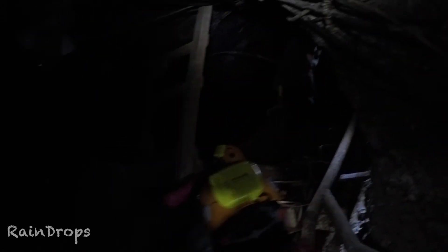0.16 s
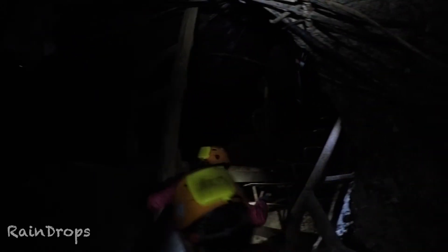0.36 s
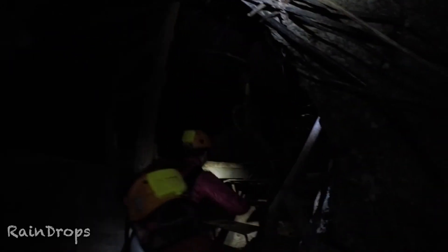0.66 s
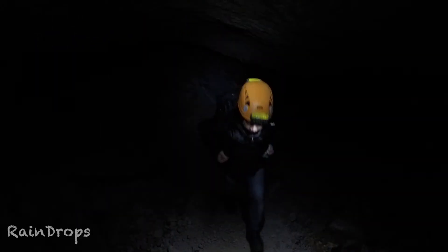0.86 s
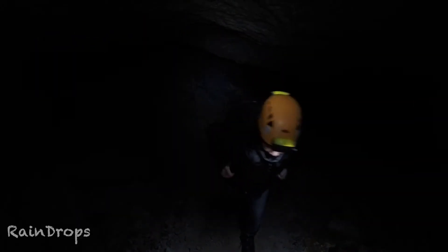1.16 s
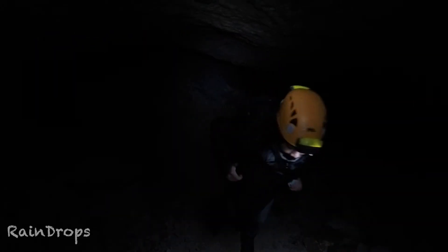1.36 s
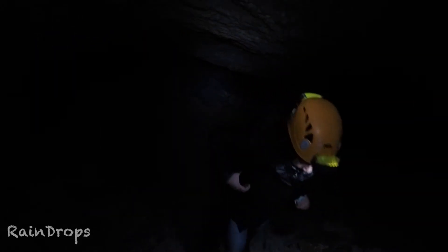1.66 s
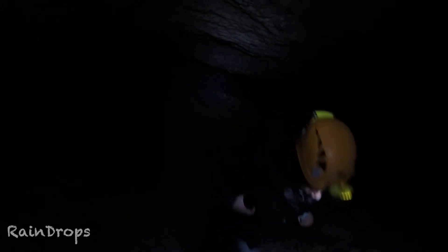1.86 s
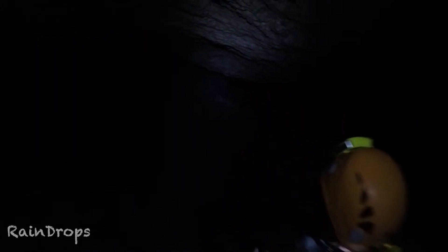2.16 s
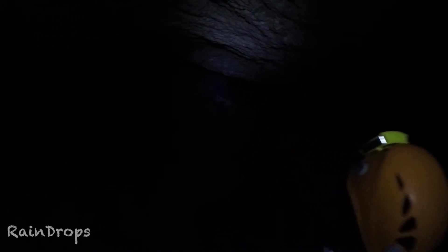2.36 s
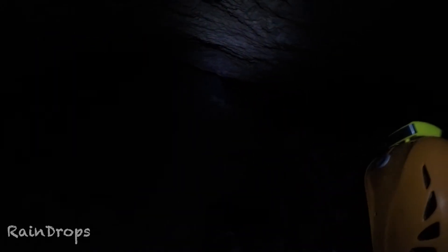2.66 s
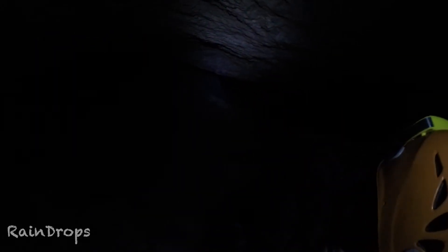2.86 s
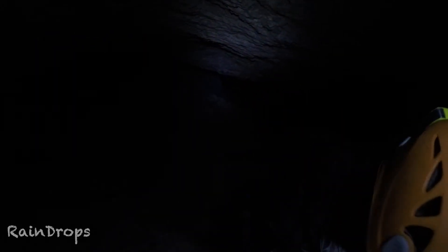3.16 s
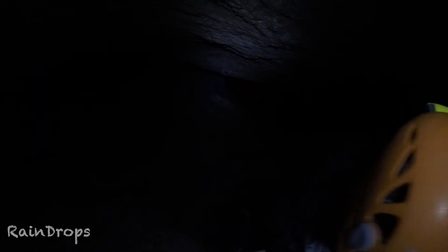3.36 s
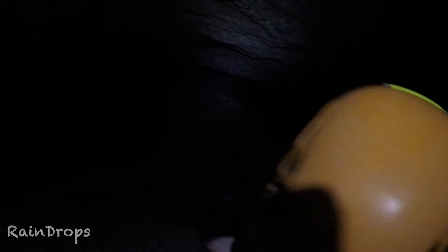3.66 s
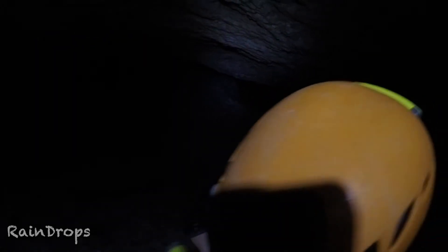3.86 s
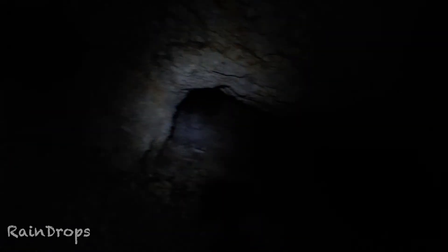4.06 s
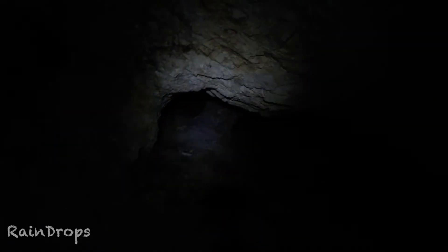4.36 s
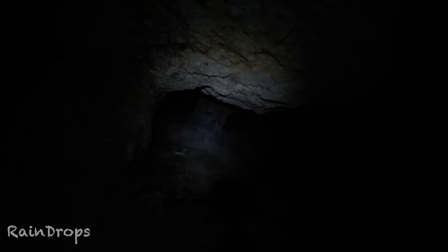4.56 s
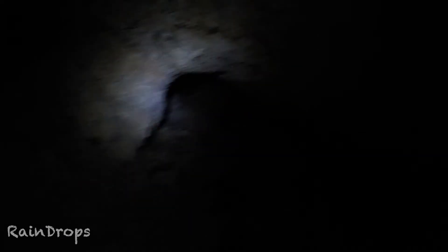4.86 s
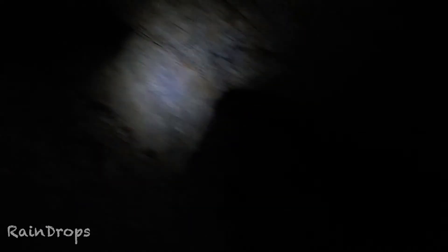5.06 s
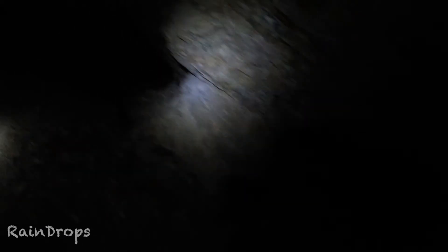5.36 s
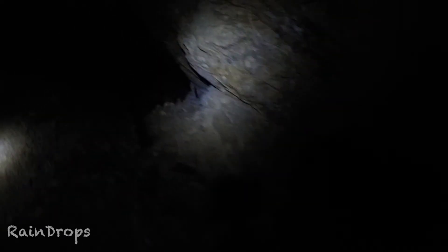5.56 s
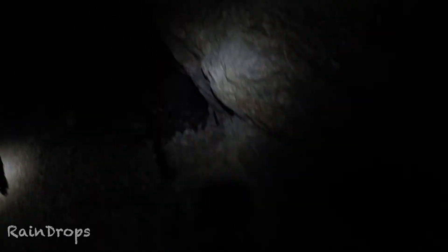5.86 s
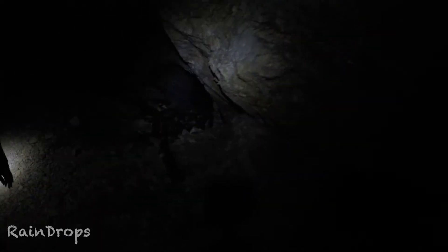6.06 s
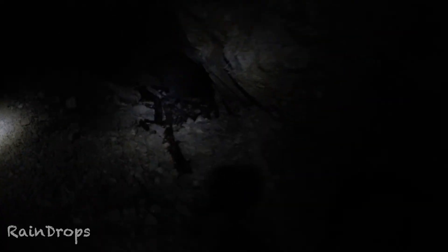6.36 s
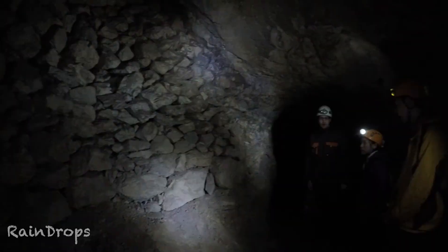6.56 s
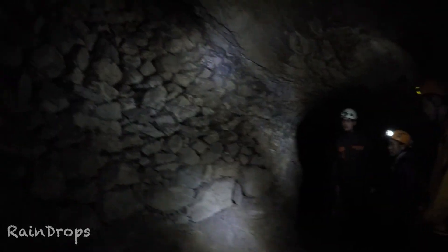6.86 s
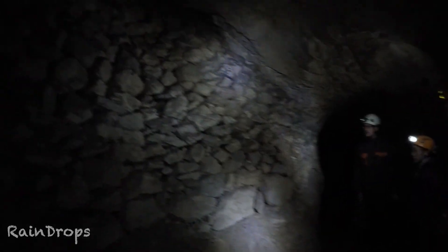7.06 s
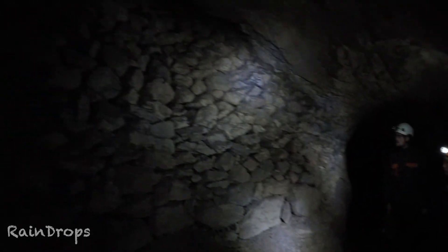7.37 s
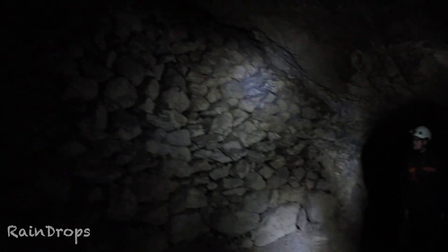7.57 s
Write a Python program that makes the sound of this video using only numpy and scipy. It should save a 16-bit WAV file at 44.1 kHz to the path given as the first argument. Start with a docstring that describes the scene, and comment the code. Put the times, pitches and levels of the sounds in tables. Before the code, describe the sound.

Close, irregular footsteps scuff and grind on loose gravel and rock in a dry underground tunnel, over a faint hiss.

```python
"""Boots tread and scuff over loose stones in a dry rock tunnel, close to a small stereo microphone.
Gravel grinds as weight rolls over it and sends a rumble through the ground. Stones knock together
under the soles, hard pebbles clink, and the near walls give both a short dull tail.
Stray chips tick and a faint hiss lies below."""
import sys
import numpy as np
from scipy import signal
from scipy.fft import rfft, irfft, next_fast_len
from scipy.io import wavfile

SR = 44100
rng = np.random.default_rng(int(sys.argv[2]) if len(sys.argv) > 2 else 0)


def store_pcm(level_fs):
    """Save levels as 16-bit WAV."""
    pcm = np.round(np.clip(level_fs, -1, 1) * 32767).astype(np.int16)
    wavfile.write(sys.argv[1], SR, np.atleast_2d(pcm).T)


N = 340452
HIT_SAMPLES = 3072
LEFT_DB, LEFT_LAG_S = -1.93, 3.5e-5   # feet, left re right


def from_db(db):
    """Decibels to gain."""
    return np.exp(np.asarray(db) * np.log(10) / 20)


def rms_one(x):
    """Scaled to rms 1."""
    return x / np.sqrt(np.mean(x ** 2) + 1e-20)


def peak_one(x):
    """Each row scaled to peak 1."""
    return x / np.max(np.abs(x), axis=-1, keepdims=True)


def pan(left_db):
    """Stereo gains for a level of left re right."""
    return from_db([[left_db / 2], [-left_db / 2]])


def at_hz(points, hz):
    """Table read on a log-frequency axis."""
    points_hz, values = np.transpose(points)
    return np.interp(np.log(hz), np.log(points_hz), values)


def band(x, low_hz, high_hz):
    """Gentle band-pass."""
    return signal.sosfilt(signal.butter(2, [low_hz, high_hz], "band", fs=SR, output="sos"), x)


def lowpass(x, cut_hz):
    """Sixth-order low-pass."""
    return signal.sosfilt(signal.butter(6, cut_hz, fs=SR, output="sos"), x)


def drift(rate_hz):
    """Slow noise, rms 1, one value per 20 samples."""
    pole = np.exp(-2 * np.pi * rate_hz * 20 / SR)
    slow = signal.lfilter([1], [1, -2 * pole, pole * pole], rng.standard_normal(N // 20 + 2002))
    return rms_one(slow[2000:])


def flicker(db):
    """Levels at every 20th sample to a gain per sample."""
    return np.interp(np.arange(N) / 20, np.arange(len(db)), from_db(db))


def ring(drive, hz, t60_s):
    """One mode: a unit click starts a decaying sine of height 1."""
    r, w = from_db(-60 / (t60_s * SR)), 2 * np.pi * hz / SR
    return signal.lfilter([0, np.sin(w)], [1, -2 * r * np.cos(w), r * r], drive + 1e-18)


def coloured(sources, spectrum, coherence, shared_db, own_db, rate_hz):
    """Mid/side noise to stereo, rms 1; half-octave bands flicker together and on their own."""
    mid_side, together = np.zeros((2, N)), drift(rate_hz)
    edges_hz = 20 * 2 ** np.arange(0, 9.1, .5)
    for k, (low, high) in enumerate(zip(edges_hz, edges_hz[1:])):
        hz = np.sqrt(low * high)
        if spectrum[0][0] < high and low < spectrum[-1][0]:
            alike = np.clip(at_hz(coherence, hz), -1, 1)
            source = sources[k % len(sources)] * np.sqrt([[1 + alike], [1 - alike]])
            gain = flicker(at_hz(spectrum, hz) + shared_db * together + own_db * drift(rate_hz))
            mid_side += band(source, low, high) * gain
    return rms_one(mid_side[0] + mid_side[1] * [[1], [-1]])


def footsteps():
    """Grind and grit levels [dB]: each step holds a steady grind and swells to a crunch at full weight."""
    # steps: (landing [s], time on ground [s], steady grind [dB], landing to full weight [s],
    # crunch [dB], crunch swell [dB/s], grit re grind [dB])
    steps = [(-0.05, .33, -56, .17, -51.5, 70.5, -19.5), (0.35, .45, -71, 0.092, -71.5, 66, -4),
             (0.999, .59, -58, .21, -49, 80, -14.5), (2.47, .77, -68, .43, -47.5, 38, -8),
             (3.42, 0.22, -71.5, 0.19, -71, 74, 4), (3.712, .3, -67, .06, -61.5, 69, -14),
             (4.05, .36, -55, 0.15, -48, 60, -7), (4.45, .22, -71.5, .1, -66, 64.5, -2.5),
             (5.22, .3, -70.5, 0.084, -72, 69, 0), (5.599, .18, -59, .1, -61.5, 69, -8),
             (5.914, .27, -55, .06, -47, 160.5, -9.5), (6.35, .6, -75.5, 0.11, -76.5, 68, 4),
             (7.022, .14, -64.5, 0.021, -64, 67, -6), (7.24, .5, -58, .17, -44.5, 69.5, -9)]
    land_db_per_s, lift_db_per_s, ease_db_per_s = 301.5, 198, 109.5
    t = np.arange(0, N, 40) / SR
    land_s, stay_s, hold_db, full_s, peak_db, swell_db_per_s, grit_db = np.transpose(steps)[:, :, None]
    onset_db = land_db_per_s * np.maximum(land_s - t, 0)
    steady_db = hold_db - onset_db - lift_db_per_s * np.maximum(t - land_s - stay_s, 0)
    late_s = t - land_s - full_s
    off_peak_db = swell_db_per_s * np.maximum(-late_s, 0) + ease_db_per_s * np.maximum(late_s, 0)
    crunch_db = peak_db - onset_db - off_peak_db
    grind = from_db(steady_db) ** 2 + from_db(crunch_db) ** 2
    grit = from_db(steady_db + grit_db) ** 2 + from_db(crunch_db + grit_db - 13.5) ** 2   # duller crunch
    return [np.interp(np.arange(N) / SR, t, 10 * np.log10(power.sum(axis=0))) for power in (grind, grit)]


def grains(per_s, spread_db, smooth):
    """Slips between pebbles: random clicks of uneven size over smooth noise."""
    sizes = from_db(spread_db * np.minimum(rng.exponential(1, (2, N)), 5)) * rng.choice([-1, 1], (2, N))
    slips = sizes * (rng.random(N) < per_s / SR)
    return [rms_one(slips) + smooth * rng.standard_normal((2, N))]


def gravel(grind_db, grit_db):
    """Gravel grinding under load, its rumble through the ground and fine grit on top."""
    # spectra: (frequency [Hz], relative density [dB])
    grind_spectrum = [(90, -20.5), (150, 4), (520, 7.5), (800, 3.5), (1500, 0), (2500, -11.5),
                      (4000, -21.5), (6000, -49.5)]
    rumble_spectrum = [(20, -40.5), (50, -18.5), (100, -0.5), (200, -1), (350, -9), (700, -31.5)]
    grit_spectrum = [(1500, -20), (2500, -2), (3500, 0), (5000, -6), (6500, -13), (8000, -30), (9000, -45)]
    # stereo image: (frequency [Hz], left-right coherence [0..1])
    coherence = [(30, .1), (100, .975), (250, .995), (1000, .99), (4000, .93), (8000, .8)]
    ground_lag_s, ground_rest_db = .017, -77.5
    pole = np.exp(-1 / (ground_lag_s * SR))
    rumble_db = -63 + .85 * signal.lfilter([1 - pole], [1, -pole], grind_db + 58)   # trails the grind
    rumble_gain = np.hypot(from_db(rumble_db), from_db(ground_rest_db))
    coarse = grains(per_s=1300, spread_db=3.8, smooth=.85)
    grind = coloured(coarse, grind_spectrum, coherence, shared_db=2.6, own_db=1.8, rate_hz=30)
    noise = rng.standard_normal((2, 2, N))
    rumble = coloured(noise, rumble_spectrum, coherence, shared_db=2.5, own_db=2, rate_hz=14)
    fine = grains(per_s=700, spread_db=4.5, smooth=.7)
    grit = coloured(fine, grit_spectrum, coherence, shared_db=2.2, own_db=1.5, rate_hz=40)
    return from_db(grind_db) * grind + rumble_gain * rumble + from_db(grit_db) * grit


def settling(per_s=60, band_db=-82):
    """Stray chips slip: faint ticks of three sizes, a few ms each."""
    bands_hz = [(400, 1100), (900, 2200), (1800, 4000)]
    slips = rng.random((3, N)) < per_s / 3 / SR
    ticks = slips * from_db(3 * np.minimum(rng.exponential(1, (3, N)), 3))
    rattles = signal.lfilter([1], [1, -.995], ticks) * rng.standard_normal((3, N))
    return from_db(band_db) * sum(rms_one(band(rattle, *hz)) for rattle, hz in zip(rattles, bands_hz))


def hiss(broad_db=-69.5, bright_db=-74.5):
    """Faint, slightly wavering floor with a brighter band in the low treble."""
    # floor: (frequency [Hz], relative density [dB])
    spectrum = [(20, 0.5), (75, 0.5), (250, -9.5), (450, -2), (850, -10), (1500, -10), (2500, -15),
                (4300, -18), (6000, -17.5), (7500, -31.5), (9000, -45)]
    # stereo image: (frequency [Hz], left-right coherence [0..1])
    coherence = [(30, 0.1), (120, 0.33), (500, 0.89), (2000, 0.68), (4200, 0.15), (8500, 0.064)]
    noise = rng.standard_normal((2, 2, N))
    broad = coloured(noise, spectrum, coherence, shared_db=1.2, own_db=1.2, rate_hz=4)
    mid, side = rng.standard_normal((2, N))
    bright = rms_one(band(mid + .5 * side * [[1], [-1]], 3050, 3850))
    bright *= flicker(bright_db + 2.4 * drift(rate_hz=4.1))
    return lowpass((from_db(broad_db) * broad + bright) * pan(-2.2), 7150)


def clinks():
    """Small hard pebbles collide: a brief broad snap and a bright ring of two close modes."""
    # pebble hits: (time [s], ring peak [dB], pitch [Hz], snap peak [dB], left re right [dB], t60 [s])
    hits = [(0.0152, -44, 4050, -52, -3, .012), (0.2125, -53, 5150, -66, 2, 0.052),
            (0.312, -39, 2960, -42.5, 6, 0.011), (0.6362, -43, 3700, -44, 2, 0.01),
            (0.6364, -46, 5730, -49, -2, .055), (0.6366, -52, 6370, -62, 4, 0.027),
            (0.664, -60, 3720, -66, -.5, .02), (1.0847, -40, 4060, -31, -2, 0.016),
            (1.5343, -55, 3850, -36, 1, .025), (2.54, -51, 3160, -55, -3, 0.02),
            (2.5589, -55, 3060, -51, -5, 0.02), (2.6579, -52, 3430, -42, -2, 0.029),
            (2.722, -57, 3000, -50.5, 3, .03), (2.8675, -52, 2640, -48, 3, 0.022),
            (2.876, -58, 4300, -47, -2, 0.028), (2.9124, -42.5, 6200, -56, 6, 0.012),
            (3.0728, -52, 4270, -44.5, -2, .018), (3.9977, -57, 3050, -44, -3, 0.025),
            (4.0557, -65, 3350, -59, -2, .022), (4.0866, -47, 2930, -54, -2, .02),
            (4.1064, -42, 3840, -57, -4, 0.018), (4.137, -45, 3200, -46, -4, .02),
            (4.2232, -42.5, 3390, -44.5, -2, .018), (4.3221, -52, 3600, -60, -3, .01),
            (4.3432, -42, 2460, -38, -3, .045), (4.345, -55, 4460, -46, -4, .04),
            (4.3588, -45.5, 4420, -40, -2, .014), (4.3595, -43, 3100, -41, -3, .016),
            (4.391, -43, 2860, -41.5, -5, .04), (4.392, -61.5, 4470, -54, -5, .035),
            (4.4681, -54, 3580, -66, -9, 0.023), (4.6242, -60, 3760, -50.5, -4, .025),
            (5.7264, -69, 3420, -50.5, -6, .025), (5.9608, -50, 2820, -40.5, 1, 0.017),
            (6.0814, -36, 2890, -63, -1, 0.024), (6.125, -47, 2800, -47, -2, .018),
            (6.3215, -48, 8040, -44, -5, .008), (7.0618, -67, 3240, -56, -5, .025),
            (7.0999, -61, 3600, -46, -3, 0.024), (7.316, -60, 4500, -43, -2, .02),
            (7.343, -45, 3000, -60, -2, .025), (7.3512, -43, 4200, -56, -2, .017),
            (7.3515, -33, 2700, -60, -2, .045), (7.36, -48, 4450, -62, -2, .02),
            (7.4483, -43, 4900, -52, 1, .017), (7.4657, -30, 4650, -40, 0, .009),
            (7.509, -49, 2970, -67, -5, .02), (7.5224, -30, 4500, -44, 0, .015),
            (7.7148, -51.5, 3700, -63, -3, 0.018)]
    out, t = np.zeros((2, N + HIT_SAMPLES)), np.arange(HIT_SAMPLES) / SR
    for time_s, ring_db, hz, snap_db, pan_db, t60_s in hits:
        crack = rng.standard_normal(HIT_SAMPLES) * from_db(-60 * t / min(.9 * t60_s, .016))
        blow = (t == 0) + .3 * crack
        modes = ring(blow, hz, t60_s) + .4 * ring(blow, 1.05 * hz, t60_s / 2)
        pebble = band(modes, hz / 1.2, hz * 1.2)
        first_contact = 1 + .8 * np.exp(-t / .0005)
        snap = lowpass(band(crack * first_contact, 1500, 6000), 7800)
        clink = from_db(ring_db) * peak_one(pebble) + from_db(snap_db) * peak_one(snap)
        at = round(time_s * SR)
        out[:, at:at + HIT_SAMPLES] += clink * pan(pan_db)
    return out[:, :N]


def knocks(extra_hits, press_s=.02, press_db=-12):
    """Blunt stones knock under the soles: a dying rattle feeds a short ring, thud, clack and chips."""
    # stone hits: (time [s], ring peak [dB], pitch [Hz], thud peak [dB], clack peak [dB], rattle t60 [s])
    hits = [(0.016, -37.5, 436, -47, -35, 0.081), (0.095, -38.5, 328, -38.5, -37.5, 0.11),
            (0.145, -38, 1400, -38, -35.5, 0.051), (0.245, -43.5, 574, -48, -40.5, 0.072),
            (0.3117, -36, 650, -48, -27, 0.021), (0.314, -35.5, 2110, -70, -48, 0.022),
            (0.321, -44, 1500, -70, -47, 0.045), (0.457, -69, 935, -78, -53.5, 0.067),
            (0.574, -42.5, 1680, -44.5, -40, 0.033), (0.749, -76, 511, -76, -52, 0.035),
            (0.863, -44.5, 190, -48.5, -73, .026), (0.953, -39, 265, -39.5, -38.5, 0.082),
            (1.07, -56, 600, -44, -46, 0.038), (1.083, -36.5, 350, -36, -50, 0.018),
            (1.114, -42.5, 232, -35, -49, 0.073), (1.142, -45, 896, -57, -36, 0.085),
            (1.187, -31, 376, -29, -40, 0.021), (1.201, -46, 403, -32, -43, .04),
            (1.233, -37, 415, -36.5, -42, 0.079), (1.282, -40, 1090, -44, -43.5, 0.05),
            (1.373, -45.5, 400, -45, -47, 0.068), (1.499, -54.5, 480, -42, -48, 0.053),
            (1.532, -39, 1370, -44, -39.5, 0.057), (1.634, -45.5, 181, -53, -50, .039),
            (1.837, -56, 384, -55, -70, 0.017), (2.008, -59, 2200, -70, -59, 0.044),
            (2.264, -60, 1000, -75, -58, 0.027), (2.292, -60, 500, -68, -75, .02),
            (2.378, -61, 245, -61, -73, 0.028), (2.541, -56, 223, -64, -47.5, 0.093),
            (2.619, -54, 800, -47, -60, 0.057), (2.658, -45, 408, -44, -42, 0.043),
            (2.709, -45.5, 312, -42, -43, .1), (2.725, -47, 810, -50, -48, 0.074),
            (2.752, -52, 700, -49, -50, 0.065), (2.803, -53, 535, -47, -54, 0.056),
            (2.835, -46, 1300, -48.5, -48, 0.071), (2.869, -56.5, 396, -63, -43, 0.16),
            (2.911, -27, 1133, -33.5, -32.5, 0.057), (2.935, -36.5, 395, -52, -39, 0.06),
            (2.982, -40.5, 387, -36.5, -63, 0.054), (3.073, -37.5, 424, -65, -34, 0.028),
            (3.101, -46, 437, -52, -44, 0.1), (3.219, -46, 430, -59, -64, 0.064),
            (3.233, -42, 406, -55, -45.5, 0.052), (3.257, -38, 402, -66, -46.5, 0.069),
            (3.46, -49.5, 430, -57, -51.5, 0.11), (3.572, -54, 1880, -68, -54, .027),
            (3.745, -45, 433, -53.5, -75, 0.091), (3.944, -47.5, 386, -75, -46.5, 0.049),
            (3.997, -47.5, 174, -52, -49, 0.095), (4.061, -42.5, 1520, -65, -80, 0.042),
            (4.084, -37, 1380, -46, -52, 0.076), (4.097, -40, 1540, -40.5, -42, 0.1),
            (4.137, -37, 1540, -39, -39, 0.13), (4.162, -36.5, 470, -63, -31.5, 0.11),
            (4.191, -43, 1370, -58, -37, .14), (4.222, -33, 2200, -63, -39, 0.036),
            (4.266, -47, 180, -43, -43, 0.04), (4.28, -48, 231, -37.5, -58, 0.044),
            (4.329, -47, 2200, -56, -51, .06), (4.341, -34, 2270, -46, -37, 0.048),
            (4.352, -38.5, 457, -35, -37, 0.038), (4.384, -47, 400, -48, -45, 0.031),
            (4.388, -31, 2220, -50, -56, 0.047), (4.577, -55, 1700, -60, -53, 0.02),
            (4.647, -52.5, 1320, -80, -68, 0.018), (4.72, -57.5, 450, -62, -68, .022),
            (4.768, -54, 890, -57.5, -57, 0.022), (5.243, -51, 1570, -55, -49, 0.063),
            (5.359, -59, 393, -72, -49, 0.058), (5.579, -55, 404, -52, -67, 0.046),
            (5.615, -43.5, 385, -63, -42, .11), (5.701, -51, 514, -46, -47.5, 0.062),
            (5.811, -40, 342, -36.5, -63, 0.026), (5.914, -42, 374, -47, -48, 0.1),
            (5.955, -42, 510, -39, -53, .03), (5.96, -28.5, 524, -34.5, -37.5, .07),
            (5.972, -32, 806, -37, -47, 0.1), (6.0, -31.5, 1790, -33, -45, .06),
            (6.017, -33.5, 504, -47, -60, 0.12), (6.078, -35, 675, -38, -32, .063),
            (6.12, -40, 370, -42, -35, 0.088), (6.155, -42, 270, -40.5, -48, .058),
            (6.4262, -37, 940, -41.5, -36.5, 0.017), (6.71, -53.5, 181, -45, -78, 0.021),
            (7.017, -54, 334, -49, -66, 0.092), (7.149, -55, 660, -38, -41, 0.025),
            (7.159, -56, 180, -43, -48, 0.023), (7.223, -41, 577, -50, -58, 0.027),
            (7.241, -49, 1800, -67, -56, .025), (7.279, -47, 273, -39.5, -42.5, 0.12),
            (7.307, -37.5, 414, -55, -34.5, 0.17), (7.35, -27.5, 1580, -44, -29.5, 0.049),
            (7.37, -50, 2890, -48, -34.5, 0.023), (7.38, -29.5, 960, -64, -32.5, 0.017),
            (7.407, -31, 990, -46, -29.5, 0.048), (7.43, -43, 1480, -42, -36.5, 0.067),
            (7.449, -30, 420, -28, -31, 0.056), (7.507, -40, 517, -42, -31, 0.053),
            (7.523, -45, 1590, -59, -31, 0.017), (7.544, -47.5, 850, -41, -39.5, 0.086),
            (7.58, -40.5, 1780, -66, -38, 0.022), (7.706, -48, 1100, -55, -48, 0.021)]
    time_s, ring_db, pitch_hz, thud_db, clack_db, t60_s = np.transpose(hits + extra_hits)[:, :, None]
    t60_s = np.clip(t60_s, .008, .15)
    noise = rng.standard_normal((len(time_s), 3, HIT_SAMPLES))
    t = np.arange(HIT_SAMPLES) / SR - press_s
    # stones grate just before a long knock
    grating = from_db(press_db) * np.clip(t60_s / .03 - 1, 0, 1) * np.exp(4 * np.minimum(t, 0) / press_s)
    t = np.maximum(t, 0)
    rise_s = .0004 * (t60_s / .035) ** 2   # short knocks start at once, long scuffs build up
    swell = grating + (1 - grating) * (1 - np.exp(-t / rise_s))
    drives = noise[:, 0] * swell * from_db(-60 * t / (.34 * t60_s))
    stone = peak_one([ring(drive, hz, .011 + 4 / hz) - .6 * ring(drive, 1.23 * hz, .005 + 4 / hz)
                      for drive, hz in zip(drives, pitch_hz[:, 0])])
    long_rattle = noise[:, 1] * swell * from_db(-60 * t / (1.74 * t60_s)) + 1e-18
    thud = peak_one(band(band(long_rattle, 100, 850), 67, 1800))
    first_contact = 1 + 1.8 * np.exp(-t / .0005) * (t > 0)
    rattle = noise[:, 2] * swell * first_contact * from_db(-60 * t / t60_s) + 1e-18
    chips = from_db(-17) * peak_one(lowpass(band(rattle, 1700, 5400), 5660))
    clack = peak_one(band(band(rattle, 600, 2360), 510, 2390))
    sounds = from_db(ring_db) * stone + from_db(thud_db) * thud + from_db(clack_db) * (clack + chips)
    starts = ((time_s[:, 0] - press_s) * SR).astype(int) + HIT_SAMPLES
    out = np.zeros((2, N + 2 * HIT_SAMPLES))
    for at, knock, lean in zip(starts, sounds, noise[:, 0, 0]):
        out[:, at:at + HIT_SAMPLES] += knock * pan(LEFT_DB + .8 * lean)
    return out[:, HIT_SAMPLES:N + HIT_SAMPLES]


def small_stones(grind_db, count=30, above_grind_db=2):
    """Rows for knocks(): lesser random hits, likeliest where the weight bears."""
    when, pitch, thud, clack, length = rng.random((count, 5)).T
    odds = np.cumsum(from_db(grind_db))
    at = np.searchsorted(odds, when * odds[-1]).clip(0, N - 1)
    ring_db = grind_db[at] + above_grind_db
    pitch_hz, t60_s = 200 * 4 ** pitch, .025 + .036 * length
    return list(zip(at / SR, ring_db, pitch_hz, ring_db - 12 * thud, ring_db - 12 * clack, t60_s))


def walls(x, t60_s=.15, side_gain=.37):
    """Rough rock close by scatters a short dull tail, slightly different left and right."""
    t = np.arange(int(t60_s * SR)) / SR
    decay = from_db(-60 * t / t60_s) * (t > .003)
    mid, side = band(rng.standard_normal((2, len(t))), 140, 2800) * decay
    tail = mid + side_gain * side * [[1], [-1]]
    tail /= np.sqrt(np.sum(tail ** 2, axis=1, keepdims=True))
    return signal.fftconvolve(x, tail, axes=1)[:, :N]


def delay(x, lag_s):
    """Fractional delay by phase shift."""
    size = next_fast_len(N + HIT_SAMPLES)
    shift = np.exp(-2j * np.pi * np.fft.rfftfreq(size, 1 / SR) * lag_s)
    return irfft(rfft(x, size) * shift, size)[:N]


def scene():
    """Stone hits with their wall tail, loose gravel and hiss."""
    grind_db, grit_db = footsteps()
    hits = knocks(small_stones(grind_db)) + clinks()
    loose = lowpass(gravel(grind_db, grit_db) + settling(), 6790)
    feet = hits + from_db(-24.5) * walls(hits) + loose * pan(LEFT_DB)
    feet[0] = delay(feet[0], LEFT_LAG_S)
    return feet + hiss()


def record(dry):
    """Soft clipping, a steep low-pass and a trace of white converter noise."""
    ceiling, cut_hz, noise_db = .09, 9600, -104
    rounded = ceiling * np.tanh(dry / ceiling)
    noise = from_db(noise_db) * rng.standard_normal(dry.shape)
    return signal.sosfilt(signal.cheby2(12, 70, cut_hz, fs=SR, output="sos"), rounded) + noise


dry = scene()
out = record(dry)
store_pcm(out)
```